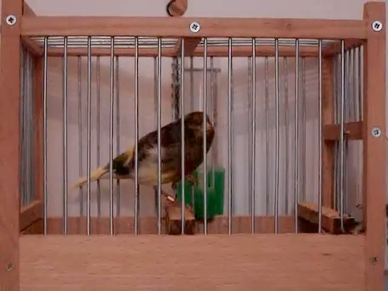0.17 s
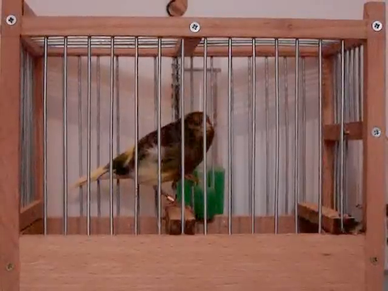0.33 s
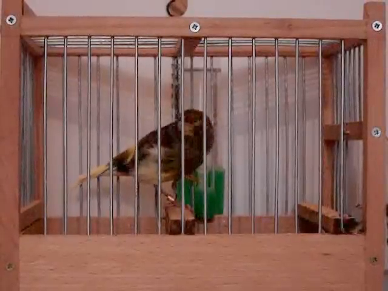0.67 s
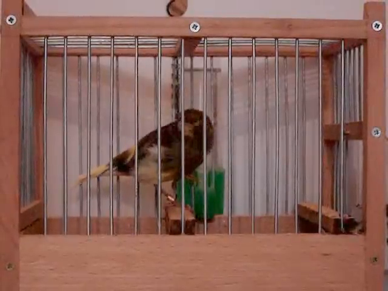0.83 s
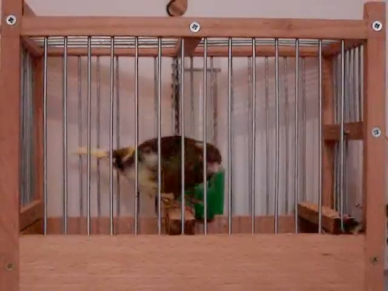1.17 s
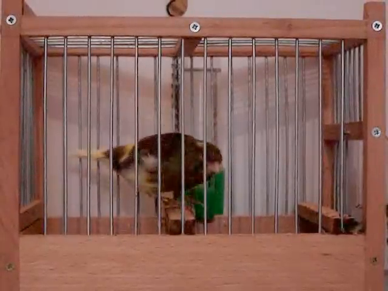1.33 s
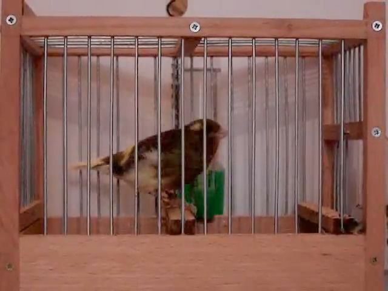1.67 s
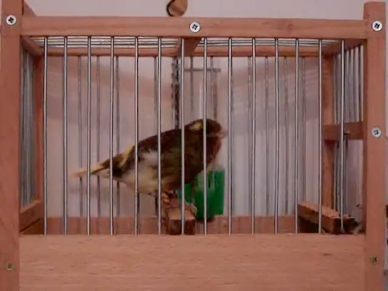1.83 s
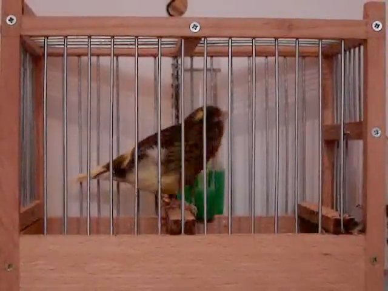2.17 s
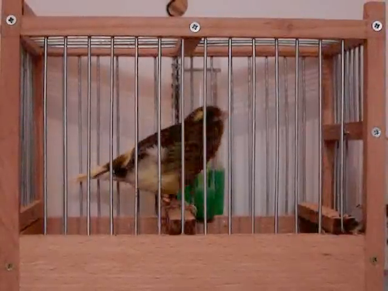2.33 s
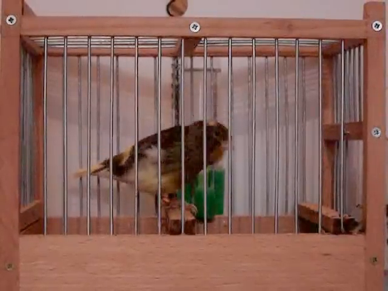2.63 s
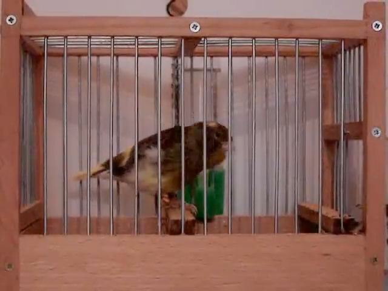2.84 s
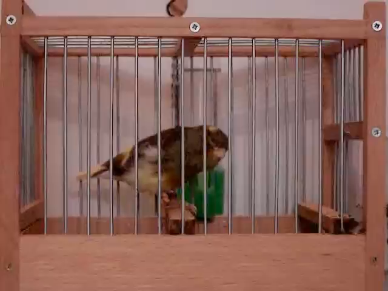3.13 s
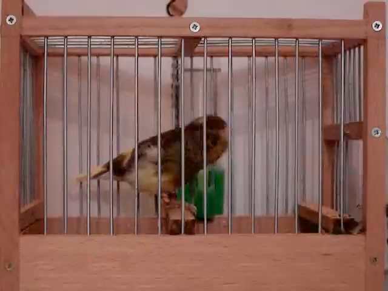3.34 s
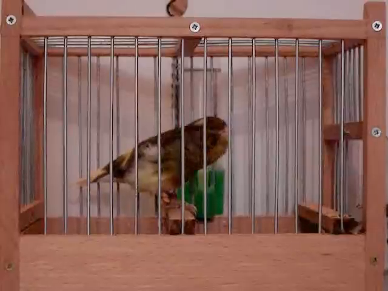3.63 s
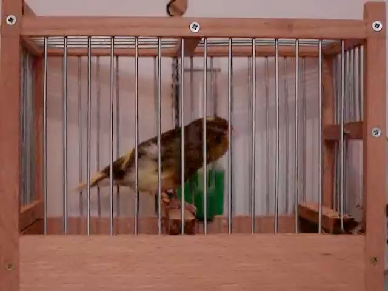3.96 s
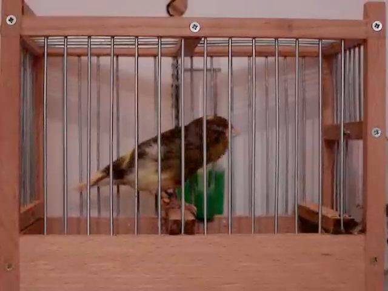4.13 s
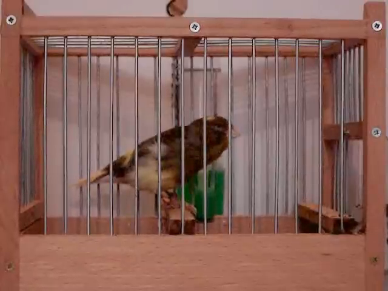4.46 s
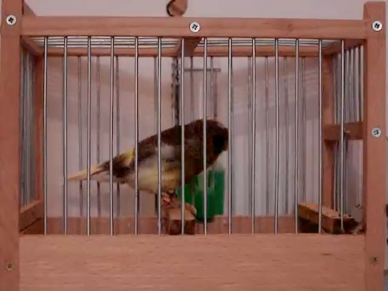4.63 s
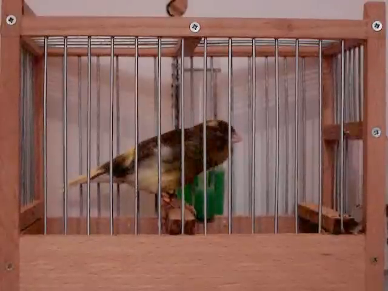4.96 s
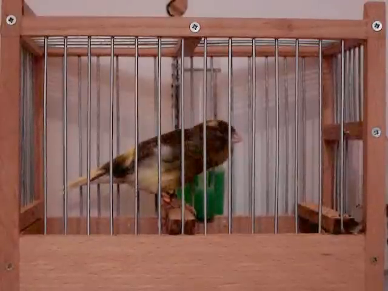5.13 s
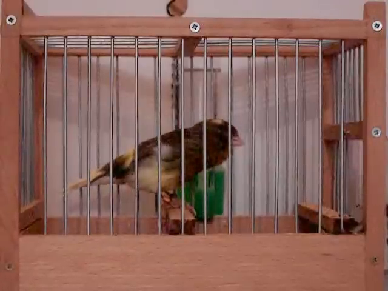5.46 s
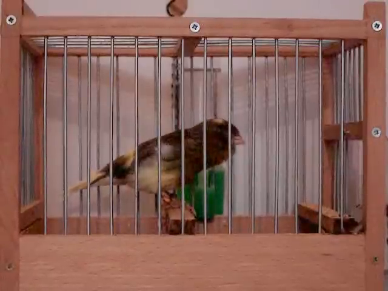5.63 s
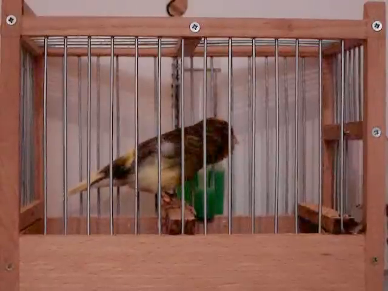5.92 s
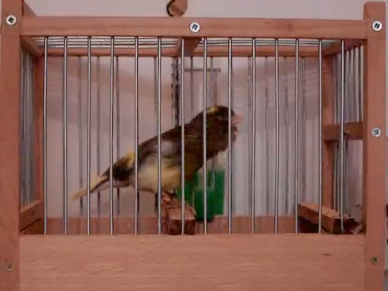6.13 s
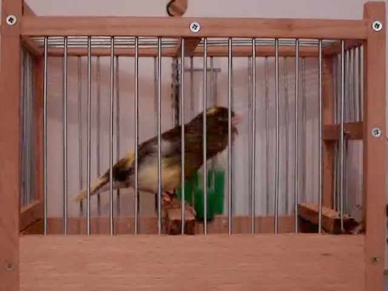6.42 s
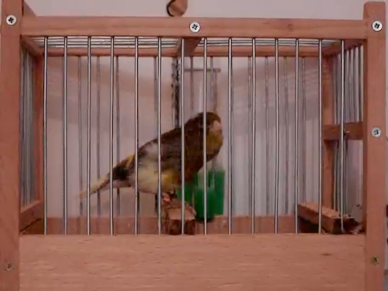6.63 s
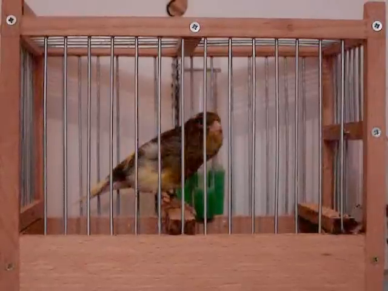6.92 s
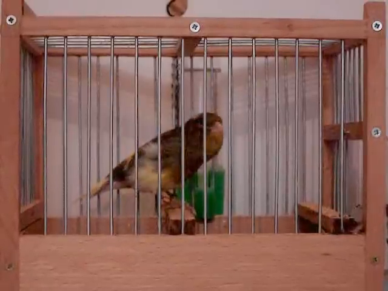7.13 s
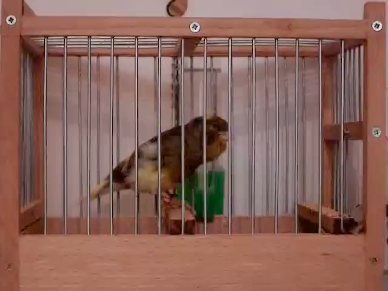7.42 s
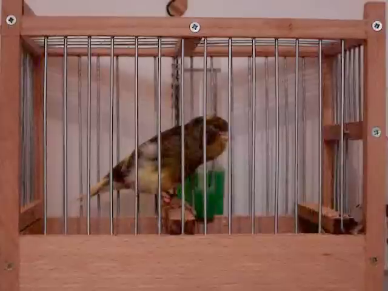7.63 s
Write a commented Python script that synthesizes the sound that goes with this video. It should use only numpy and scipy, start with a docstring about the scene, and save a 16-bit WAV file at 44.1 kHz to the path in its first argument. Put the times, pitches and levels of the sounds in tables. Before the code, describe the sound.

A caged canary gives a wooden perch knock, arched chirps and thin whistles, then paired down-slurs, a fast rising trill and rhythmic double notes.

```python
"""Room hiss and a thin electrical whine lie under a canary in a wooden cage in a small bare room. Feathers rustle,
the perch knocks, then soft notes, low arched chirps and thin whistles come, the middle whistle with a rasp; a low
rumble swells near 3 s and stays on faintly. Paired down-slurs, a fast rising trill, a row of double slurs and two
soft notes follow. Each note is a near-pure tone from the syrinx; the cage and the walls throw it back."""
import sys
import numpy as np
from scipy import signal
from scipy.fft import rfft, irfft
from scipy.io import wavfile

SR = 44100
rng = np.random.default_rng(int(sys.argv[2]) if len(sys.argv) > 2 else 0)


def digitize_waveform(pressure):
    """Quantize a signal to 16-bit integers and store it at the path in sys.argv[1].

    Rows of a 2-D input are taken as channels; values are limited to [-1, 1].
    """
    field = np.atleast_2d(pressure).T
    bounded = np.clip(field, -1, 1)
    quanta = np.round(bounded * 32767).astype(np.int16)
    wavfile.write(sys.argv[1], SR, quanta)


N = 343539  # length in samples


def amp(db):
    """Decibels to gain."""
    return 10 ** (np.asarray(db) / 20)


def unit(x):
    """Scales to an rms of one."""
    return x / np.sqrt(np.mean(x ** 2) + 1e-20)


def read(points, hz):
    """Reads a table on a log-frequency axis."""
    f, value = np.transpose(points)
    return np.interp(np.log(hz + 1), np.log(f + 1), value)


def add(mix, start_s, sound):
    """Adds a sound into the mix at its start time."""
    part = mix[round(start_s * SR):][:len(sound)]
    part += sound[:len(part)]


def play(table, note):
    """Plays one note per row: the start time, then the note's own settings."""
    out = np.zeros(N)
    for start_s, *settings in table:
        add(out, start_s, note(*settings))
    return out


def wander(count, hz):
    """Smooth random motion of rms near one, with little left above the given rate."""
    padded = count + SR // 10
    f = np.fft.rfftfreq(padded, 1 / SR)
    spectrum = rfft(rng.standard_normal(padded)) * np.exp(-(f / hz) ** 2)
    return unit(irfft(spectrum))[:count]


def shaped_noise(points):
    """Noise of rms one with the spectrum of a table."""
    f = np.fft.rfftfreq(N, 1 / SR)
    return unit(irfft(rfft(rng.standard_normal(N)) * amp(read(points, f)), N))


def gate(t, rise, fall):
    """Rounded opening and closing of a note."""
    opening = np.sin(np.pi / 2 * np.clip(t / rise, 0, 1)) ** 2
    closing = np.sin(np.pi / 2 * np.clip((t[-1] - t) / fall, 0, 1)) ** 2
    return opening * closing


# spectrum of the room hiss, relative: (pitch_hz, level_db)
HISS_SPECTRUM = [(15, -59), (25, -25), (92, -9), (118, -12), (137, -7.5), (186, -1.5), (221, -5.5),
                 (284, -4), (394, -4.5), (470, -8), (879, -10), (1450, -12.5), (1640, -13.5), (7780, -18),
                 (10000, -24.5), (13000, -57), (22000, -120)]
HISS_DB = -52


def background(whine_hz=7860, whine_db=-69, rumble_db=-54):
    """Room hiss, an electrical whine of unsteady level, and a low rumble that swells and then stays on faintly."""
    t = np.arange(N) / SR
    hiss = shaped_noise(HISS_SPECTRUM)
    whine = unit(wander(N, 45) * np.sin(2 * np.pi * whine_hz * t))
    rumble = shaped_noise([(20, -20.5), (60, -12.5), (150, -5), (260, -9), (600, -45), (2000, -73.5)])
    swell = np.interp(t, [2.98, 3.1, 3.22, 3.5], [0, 1, 0.93, 0.24])
    return amp(HISS_DB) * hiss + amp(whine_db) * whine + amp(rumble_db) * swell * rumble


# feather rustles, levels before their fade and flutter: (start_s, level_db)
RUSTLES = [(.355, -51), (1.335, -48.5)]


def feather_rustles():
    """Ruffled feathers: soft bursts of band-limited noise with a fluttering level."""
    out, t = np.zeros(N), np.arange(0, .08, 1 / SR)
    band = signal.butter(2, [900, 5500], "band", fs=SR, output="sos")
    for start_s, level_db in RUSTLES:
        feathers = unit(signal.sosfilt(band, rng.standard_normal(len(t))))
        flutter = amp(3.2 * wander(len(t), 150))
        add(out, start_s, amp(level_db) * gate(t, 0.023, 0.087) * feathers * flutter)
    return out


# ringing modes of the cage and perch wood, relative levels: (pitch_hz, level_db, t60_s)
WOOD_MODES = [(863, -4, 0.015), (1040, 3.5, 0.023), (1320, 10, 0.0081), (2180, -14, 0.016),
              (3800, -14, 0.018), (6610, -27.5, 0.055)]


def perch_knock(knock_db=-14):
    """The bird knocks on the perch as it ducks: the modes of the wood ring and die."""
    out, t = np.zeros(N), np.arange(0, .08, 1 / SR)
    ring = sum(amp(db - 60 * t / t60) * np.sin(2 * np.pi * hz * t) for hz, db, t60 in WOOD_MODES)
    add(out, 1.2395, amp(knock_db) * gate(t, 0.0041, .01) * ring)
    return out


# Note levels are relative: the overtone tables and each note's swell and fades act on top of them.
def syrinx(hz, tone_db, jitter, jitter_hz=500):
    """A vibrating membrane: a slightly unsteady tone with weaker overtones."""
    phase = 2 * np.pi * np.cumsum(hz * (1 + jitter * wander(len(hz), jitter_hz))) / SR
    return sum(amp(db) * np.sin((k + 1) * phase) for k, db in enumerate(tone_db))


def soft_note(length, hz, db, bend=0.12):
    """A quiet note whose pitch arches slightly, or dips when the bend is negative."""
    t = np.arange(0, length, 1 / SR)
    arch = 1 + bend * (np.sin(np.pi * t / length) - .7)
    return amp(db) * gate(t, length / 2, length / 2) * syrinx(hz * arch, [0, -26, -30], 0.04)


# short soft notes, pitch before the bend: (start_s, length_s, pitch_hz, level_db)
SOFT_NOTES = [(1.351, 0.0063, 1036, -32.5), (1.591, 0.0066, 1030, -31), (4.834, 0.021, 3750, -44),
              (7.726, 0.018, 1093, -32.5), (7.742, 0.06, 1060, -25)]


def soft_notes():
    """The soft notes that stand on their own, each a short quiet syrinx tone."""
    return play(SOFT_NOTES, soft_note)


# harmonics of a chirp from the first up: (level_db)
CHIRP_TONE = [-3, -18, -22, -33, -36.5]


def chirp(length, top_hz, db, drop=0.0105, climb=0.093, end_hz=1050):
    """Pitch and level swell with pressure; then the pitch collapses."""
    t = np.arange(0, length, 1 / SR)
    pressure = np.sin(np.pi / 2 * np.clip(t / (length - drop) * 1.017, 0, 1))
    fall = np.clip((t - length + drop) / drop, 0, 1) ** 1.96
    hz = top_hz * (1 - climb * (1 - pressure)) * (1 - fall) + end_hz * fall
    swell = 0.22 + 0.65 * pressure ** 3
    return amp(db) * swell * gate(t, 0.0018, 0.0029) * syrinx(hz, CHIRP_TONE, 0.023)


# swelling chirps that end in a drop: (start_s, length_s, top_pitch_hz, level_db)
CHIRPS = [(1.396, 0.034, 1769, -18.5), (1.937, 0.041, 1696, -16), (2.811, 0.036, 1820, -18.5),
          (3.017, 0.037, 1860, -15.5)]


def chirps():
    """The arched chirps, each driven by its own swell of pressure."""
    return play(CHIRPS, chirp)


# harmonics of a whistle from the first up: (level_db)
WHISTLE_TONE = [-2, -18.5, -18.5, -27.5, -32, -41]
WHISTLE_RISE_S, WHISTLE_FALL_S = 0.039, 0.079
WHISTLE_ARCH = 0.015  # the pitch lifts by this share in mid-note
WHISTLE_SAG = 0.059  # the pitch sags by this share as pressure runs out


def whistle(length, hz, db):
    """A thin held tone that swells, arches gently, and sags as it fades."""
    t = np.arange(0, length, 1 / SR)
    arch = WHISTLE_ARCH * (np.sin(np.pi * t / length) - 1)
    bend = 1 + arch - WHISTLE_SAG * (t / length) ** 3
    tone = syrinx(hz * bend, WHISTLE_TONE, jitter=.008, jitter_hz=250)
    return amp(db) * gate(t, WHISTLE_RISE_S, WHISTLE_FALL_S) * tone


# thin whistles, pitch before the bend: (start_s, length_s, pitch_hz, level_db)
WHISTLES = [(1.548, 0.21, 1418, -27), (2.115, 0.21, 1409, -26.5), (3.165, 0.22, 1427, -27)]


def whistles():
    """The thin whistles, each a held syrinx tone."""
    return play(WHISTLES, whistle)


# course of the rasp, levels before its gain: (time_s, pitch_hz, level_db)
RASP_COURSE = [(2.11, 1522, -51), (2.135, 1456, -49.5), (2.22, 1530, -54), (2.38, 1637, -53),
               (2.43, 1638, -57)]
# harmonics of the rasp from the first up: (level_db)
RASP_TONE = [9, 2, -15, -14]


def rasp(gain_db=3.5):
    """The second side of the syrinx rasps under the middle whistle: a strongly jittered held tone."""
    out = np.zeros(N)
    s, hz, db = np.transpose(RASP_COURSE)
    t = np.arange(s[0], s[-1], 1 / SR)
    tone = syrinx(np.interp(t, s, hz), RASP_TONE, jitter=0.0683, jitter_hz=496)
    level = amp(np.interp(t, s, db) + gain_db)
    add(out, s[0], level * gate(t - s[0], 0.014, 0.0095) * tone)
    return out


# colour that throat and open beak give to the overtones of quick notes: (pitch_hz, level_db)
THROAT = [(2600, 15.5), (3300, 0), (3950, -4.5), (4450, 5), (5100, -3), (5500, -1.5), (6150, 3.5),
          (7200, -4.5), (9200, 4.5)]


def beak(hz, tone_db, jitter, grain_db=3, grain_hz=450):
    """The membrane's tone in quick notes: grainy overtones sweep through the resonances of the throat."""
    phase = 2 * np.pi * np.cumsum(hz * (1 + jitter * wander(len(hz), 720))) / SR
    tone = amp(tone_db[0]) * np.sin(phase)
    for k, db in enumerate(tone_db[1:], 2):
        grain = grain_db * wander(len(hz), grain_hz)
        tone += amp(db + read(THROAT, k * hz) + grain) * np.sin(k * phase)
    return tone


def brighten(tone_db, db):
    """Raises the overtones against the fundamental."""
    return [tone_db[0], *(np.array(tone_db[1:]) + db)]


SLIDE_FADE_DB = -2.5  # a slur weakens as it slides down


def slur(tone_db, rise, hold, fall, entry_hz, shoulder_hz, end_hz, db, swell_db=0.5):
    """A sharp start, a short shoulder, and a steep slide down."""
    t = np.arange(0, hold + fall, 1 / SR)
    settle = np.clip(1 - t / hold, 0, 1) ** 2.1
    slide = np.clip((t - hold) / fall, 0, 1) ** 1.182
    hz = shoulder_hz + (entry_hz - shoulder_hz) * settle + (end_hz - shoulder_hz) * slide
    level_db = db + swell_db * (1 - settle) + SLIDE_FADE_DB * slide
    return amp(level_db) * gate(t, rise, 0.0062) * beak(hz, tone_db, 0.037)


# down-slurs, sung in pairs: (start_s, entry_hz, shoulder_hz, level_db, overtone_boost_db)
SLURS = [(3.4598, 2210, 2203, -15, 0.5), (3.5923, 2920, 2237, -13.5, 0.5), (3.779, 2454, 2155, -14.5, 0.5),
         (3.9106, 2890, 2296, -12.5, -1), (4.139, 2640, 2292, -12.5, 0), (4.2793, 2887, 2285, -13.5, 2)]
# harmonics of a slur, and of the second stroke of a double, from the first up: (level_db)
SLUR_TONE = [-2.5, -19, -27, -37, -42.5]
SLUR_RISE_S, SLUR_HOLD_S, SLUR_FALL_S, SLUR_END_HZ = 0.0012, .0075, 0.01282, 1040
CLOSE_LENGTH_S = .02  # the soft low note that closes each slur or double slur
CLOSE_SLUR_S, CLOSE_SLUR_HZ, CLOSE_SLUR_DB = .052, 1125, -31  # its delay, pitch and level


def single_slurs():
    """Down-slurs with a steep fall in pitch, each closed by a soft low note."""
    out = np.zeros(N)
    for start_s, entry_hz, shoulder_hz, db, boost_db in SLURS:
        tone = brighten(SLUR_TONE, boost_db)
        add(out, start_s, slur(tone, SLUR_RISE_S, SLUR_HOLD_S, SLUR_FALL_S,
                               entry_hz, shoulder_hz, SLUR_END_HZ, db))
        add(out, start_s + CLOSE_SLUR_S, soft_note(CLOSE_LENGTH_S, CLOSE_SLUR_HZ, CLOSE_SLUR_DB))
    return out


# harmonics of a trill flick from the first up: (level_db)
TRILL_TONE = [0, -8.5, -23]
FLICK_FLOOR_HZ, FLICK_CEILING_HZ = 1507, 3780  # the range of pitch that a flick stays in


def trill_note(db, hz, octaves, boost_db, length=.0068):
    """A flick upward in pitch, so short that it is nearly a click."""
    t = np.arange(0, length, 1 / SR)
    glide = np.clip(hz * 2 ** (octaves * (t / length - .5)), FLICK_FLOOR_HZ, FLICK_CEILING_HZ)
    tone = beak(glide, brighten(TRILL_TONE, boost_db), 0.012)
    return amp(db) * gate(t, length / 2, length / 2) * tone


# two slow, pure ticks that lead into the trill: (middle_s, level_db, middle_pitch_hz)
LEAD_IN = [(4.897, -28.5, 1697), (4.915, -25, 1736)]
# speed of the trill: (time_s, rate_notes_per_s)
TRILL_RATE = [(4.9585, 51.9), (4.9897, 69.4), (5.1467, 62.2), (5.1982, 84.0), (5.2238, 67.9),
              (5.3306, 90.4), (5.4304, 60.6), (5.675, 66.1)]
# course of the trill, before gain and unevenness: (time_s, middle_pitch_hz, level_db)
TRILL_COURSE = [(4.975, 1900, -32), (5.069, 2100, -32), (5.123, 1940, -32), (5.249, 1940, -30.5),
                (5.355, 2714, -33), (5.425, 3100, -25), (5.557, 3460, -23.5), (5.67, 3490, -24)]
TRILL_GAIN_DB, TRILL_UNEVEN_DB = 7.5, 2.1
TRILL_UNEVEN_PITCH = 0.0045  # random share of the pitch
FLICK_LOW_OCT, FLICK_HIGH_OCT, FLICK_LEAD_OCT = 1.72, 0.57, 0.36  # how far low, high and leading notes sweep


def trill(high_boost_db=-18, lead_boost_db=-14):
    """Flicks follow one another at the trill's speed; as they climb they grow louder, narrower and purer."""
    out = np.zeros(N)
    when, rate = np.transpose(TRILL_RATE)
    t = np.arange(when[0], when[-1], 1 / SR)
    beats = np.cumsum(np.interp(t, when, rate)) / SR
    times = np.interp(np.arange(int(beats[-1]) + 1), beats, t)  # one flick per whole beat

    s, hz, db = np.transpose(TRILL_COURSE)
    uneven_level, uneven_pitch = rng.standard_normal((len(times), 2)).T
    levels = np.interp(times, s, db) + TRILL_GAIN_DB + TRILL_UNEVEN_DB * uneven_level
    pitches = np.interp(times, s, hz) * (1 + TRILL_UNEVEN_PITCH * uneven_pitch)
    high = np.clip((pitches - 2450) / 850, 0, 1)  # 0 for low flicks, 1 for high ones
    sweeps = FLICK_LOW_OCT + (FLICK_HIGH_OCT - FLICK_LOW_OCT) * high

    ticks = [(*row, FLICK_LEAD_OCT, lead_boost_db) for row in LEAD_IN]
    flicks = zip(times, levels, pitches, sweeps, high_boost_db * high)
    for middle_s, *settings in [*ticks, *flicks]:
        note = trill_note(*settings)
        add(out, middle_s - len(note) / SR / 2, note)
    return out


# double slurs, the gap running from start to start:
# (start_s, time_to_shoulder_s, shoulder_hz, level_db, overtone_boost_db, gap_s, second_level_db)
DOUBLES = [(5.759, 0.0075, 2045, -15, 0, 0.048, -15), (6.004, 0.0089, 2025, -14, -0.5, 0.047, -14),
           (6.2616, .0072, 2048, -13, 0, 0.055, -14.5), (6.53, 0.015, 1956, -16.5, -1.5, 0.056, -13.5),
           (6.779, 0.01, 1782, -14, -2.5, 0.05, -13.5), (7.027, .0095, 1952, -12, -6, .051, -16),
           (7.285, 0.012, 1900, -12, -4, 0.053, -14), (7.542, 0.0094, 2007, -11.5, -5.5, 0.052, -12)]
# harmonics of the first stroke from the first up: (level_db)
DOUBLE_TONE = [-2, -21, -22, -30.5, -45]
ENTRY_RATIO = 1.154  # each stroke starts this far above its shoulder
DOUBLE_RISE_S, FIRST_FALL_S, DOUBLE_END_HZ = 0.0052, 0.0095, 944
SECOND_HZ, SECOND_HOLD_S, SECOND_FALL_S, SECOND_BOOST_DB = 2053, 0.0085, 0.00802, -0.5
CLOSE_DOUBLE_S, CLOSE_DOUBLE_HZ, CLOSE_DOUBLE_DB = .066, 957, -37.5  # delay, pitch and level of the closing note


def double_slurs():
    """Two down-slurs in quick succession, closed by a soft low note whose pitch dips."""
    out = np.zeros(N)
    second_tone = brighten(SLUR_TONE, SECOND_BOOST_DB)
    for start_s, hold, hz, db, boost_db, gap_s, second_db in DOUBLES:
        first = slur(brighten(DOUBLE_TONE, boost_db), DOUBLE_RISE_S, hold, FIRST_FALL_S,
                     hz * ENTRY_RATIO, hz, DOUBLE_END_HZ, db)
        second = slur(second_tone, DOUBLE_RISE_S, SECOND_HOLD_S, SECOND_FALL_S,
                      SECOND_HZ * ENTRY_RATIO, SECOND_HZ, DOUBLE_END_HZ, second_db)
        close = soft_note(CLOSE_LENGTH_S, CLOSE_DOUBLE_HZ, CLOSE_DOUBLE_DB, bend=-0.24)
        add(out, start_s, first)
        add(out, start_s + gap_s, second)
        add(out, start_s + CLOSE_DOUBLE_S, close)
    return out


# first reflections, as a share of the direct sound: (delay_s, share)
ECHOES = [(.0014, 0.02), (.0082, 0.067), (.0100, 0.16), (0.0111, 0.39), (0.0167, 0.094), (0.0241, 0.074),
          (0.0248, 0.03), (0.0333, .24), (.0425, 0.084), (0.051, 0.14), (0.073, 0.086)]
# decay time of the tail: (pitch_hz, t60_s)
ROOM_T60 = [(900, 0.37), (2300, 0.39), (4000, 0.37), (6500, 0.75), (10000, 0.15)]
# colour of the tail: (pitch_hz, level_db)
ROOM_COLOUR = [(800, 3), (1400, -10), (2200, 5.5), (3400, 4), (6000, -12.5), (10000, 2)]


def room(x, tail_db=-4.0, build=0.0066):
    """Single echoes from cage and walls, and a diffuse tail whose decay time depends on frequency."""
    hz, t, bands = signal.stft(rng.standard_normal(SR), SR, nperseg=256)
    bands = bands * amp(-60 * t / read(ROOM_T60, hz)[:, None])
    tail = signal.istft(bands, SR, nperseg=256)[1][:SR] * gate(np.arange(SR) / SR, build, 0.16)
    colour = amp(read(ROOM_COLOUR, np.fft.rfftfreq(SR, 1 / SR)))
    response = amp(tail_db) * irfft(rfft(tail / np.linalg.norm(tail)) * colour)
    for delay_s, share in ECHOES:
        response[round(delay_s * SR)] += share
    return x + signal.fftconvolve(x, response)[:N]


def scene():
    """The bird sings and moves in its room, over the background."""
    movements = feather_rustles() + perch_knock()
    song = soft_notes() + chirps() + whistles() + rasp() + single_slurs() + trill() + double_slurs()
    return (room(movements + song) + background())[None]


EDGE_HZ = 10100


def record(dry):
    """The recorder's band limit: a steep low-pass."""
    low_pass = signal.firwin(511, EDGE_HZ, window=("kaiser", 9), fs=SR)
    return signal.oaconvolve(dry, low_pass[None], "same")


dry = scene()
out = record(dry)
digitize_waveform(out)
```